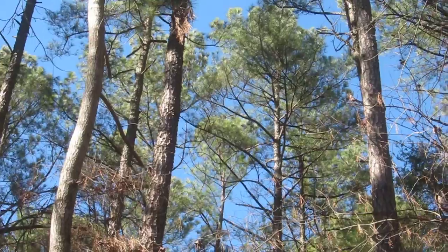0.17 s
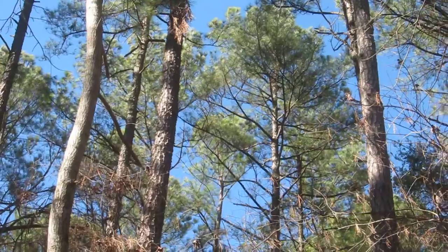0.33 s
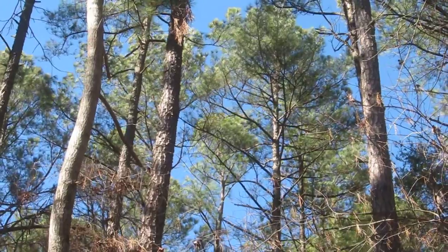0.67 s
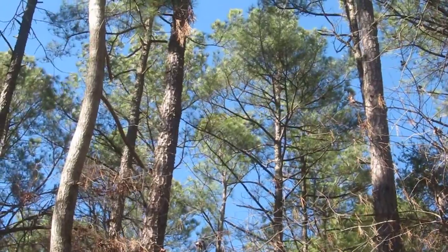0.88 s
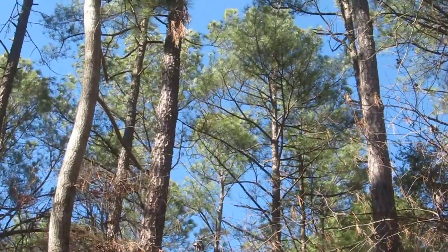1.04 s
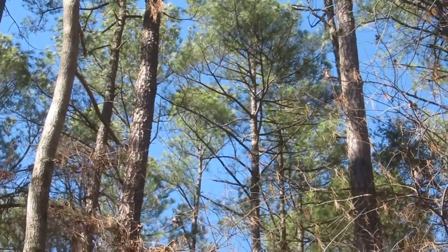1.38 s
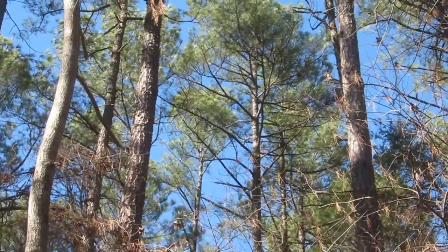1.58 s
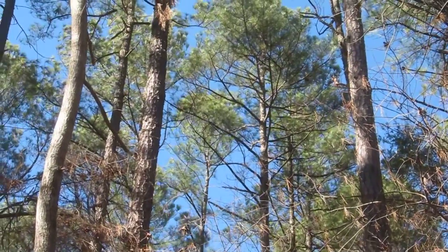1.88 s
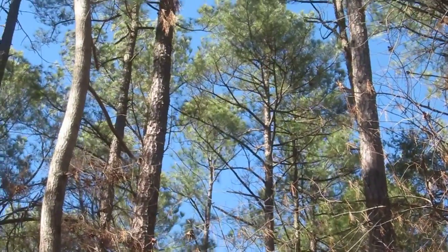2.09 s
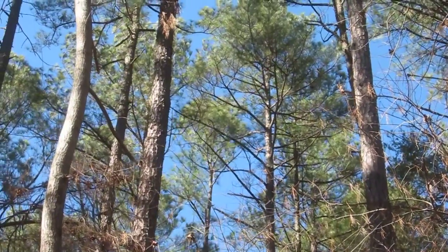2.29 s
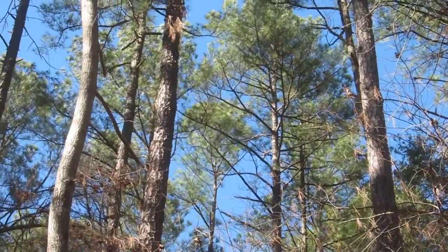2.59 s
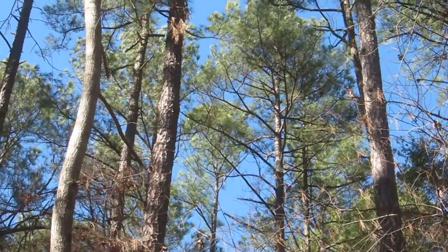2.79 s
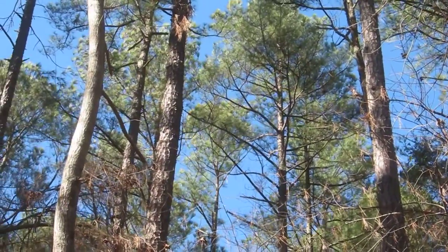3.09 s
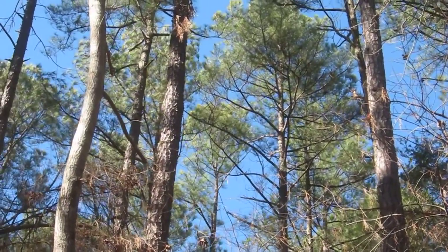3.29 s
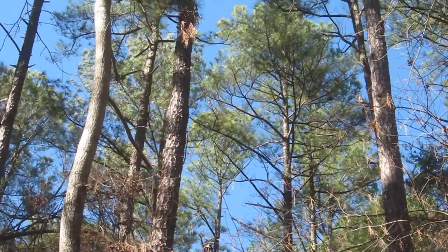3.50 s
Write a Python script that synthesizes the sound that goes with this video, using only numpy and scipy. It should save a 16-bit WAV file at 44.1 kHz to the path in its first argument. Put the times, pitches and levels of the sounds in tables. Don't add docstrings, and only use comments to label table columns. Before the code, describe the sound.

Wind roars softly in high pines while a faint bird whistles and a twig cracks

```python
import sys
import numpy as np
from scipy import signal
from scipy.fft import rfft, irfft, next_fast_len
from scipy.io import wavfile
from scipy.ndimage import uniform_filter1d, map_coordinates

SR = 44100
rng = np.random.default_rng(int(sys.argv[2]) if len(sys.argv) > 2 else 0)


def file_out(sig):
    cols = np.atleast_2d(sig).T
    lim = np.clip(cols, -1, 1)
    pcm = np.round(lim * 32767).astype(np.int16)
    wavfile.write(sys.argv[1], SR, pcm)


def gain_from_db(level_db):
    decades = np.asarray(level_db, float) / 20
    return 10 ** decades


N = 160524

# (frequency [Hz], level per hertz [dB])
RUMBLE_COLOUR = [(15, -20), (30, -9), (55, -0.5), (82, 2.5), (120, -6), (175, -15), (260, -45.5)]
# (frequency [Hz], level per hertz [dB])
CROWN_COLOUR = [(110, -2.5), (230, -3), (500, 0), (1050, -2.5), (1600, -8.5), (2600, -14.5), (4500, -20.5),
                (9000, -38.5)]
# (frequency [Hz], level per hertz [dB])
HISS_COLOUR = [(2500, -33), (5000, 9), (7000, 4), (9000, -2.5), (10800, 4), (13500, -9), (15000, -24),
               (15800, -30)]
# (frequency [Hz], likeness [0 to 1])
WIND_LIKENESS = [(40, .88), (80, .92), (150, .7), (290, .8), (640, .87), (1410, .64), (3100, .26),
                 (6800, .04)]

# (time [s], pitch [Hz], level [dB], left over right [dB])
HIGH_WHISTLE = [
    (.645, 6600, -70, 0),
    (.665, 6700, -52, -2),
    (.69, 6720, -48.5, -3),
    (.722, 6605, -49, -1),
    (.79, 6595, -49, 4),
    (.86, 6590, -50, -2),
    (.95, 6603, -55, 2),
    (1.015, 6600, -62, -2),
    (1.04, 6600, -75, 0),
]
LOW_WHISTLE = [
    (.988, 4230, -70, 0),
    (1.002, 4166, -53, 0),
    (1.022, 4056, -46, -2),
    (1.056, 3946, -44, -5),
    (1.1, 3905, -48.5, -4),
    (1.13, 3890, -44.5, -4),
    (1.17, 3863, -45, -3),
    (1.21, 3858, -44.5, -2),
    (1.224, 3840, -60, 0),
]
LOW_WHISTLE_GOES_ON = [
    (1.225, 3840, -60, -1),
    (1.28, 3810, -53, -3),
    (1.345, 3784, -44, 0),
    (1.42, 3775, -49, 5),
    (1.49, 3760, -49, -1),
    (1.53, 3735, -44.5, 1),
    (1.61, 3740, -44, 4),
    (1.69, 3715, -51, 8),
    (1.75, 3700, -66, -3),
]
WHISTLE_AGAIN = [
    (3.575, 6600, -75, 0),
    (3.59, 6630, -54.5, -1),
    (3.64, 6650, -59, 1),
]
# (frequency [Hz], time to fall 60 dB [s])
FOREST_FADE = [(1000, .6), (4000, .75), (9000, .6)]

# (time [s], peak level [dB], left over right [dB])
TWIG_BREAKS = [
    (1.43225, -12.5, 2),
    (1.4341, -33, 0),
    (1.4365, -47, 0),
]
# (frequency [Hz], level [dB], time to fall 60 dB [s])
TWIG_MODES = [(1900, -12, .008), (2700, -12, .005), (3500, -13, .003), (4300, -10, .003), (5050, 0, .0034),
              (5800, -5, .004), (6600, -11, .003), (9700, -22, .004), (11600, -19, .004),
              (13400, -25, .003), (14900, -29, .003)]
# (time [s], peak level [dB], ring [Hz], left over right [dB])
TWIG_TICKS = [(0.1337, -46, 5300, -1), (.2914, -50, 5030, -1), (.475, -47, 5000, 3), (.5478, -51, 5800, -1),
              (1.3145, -52, 11900, -5), (1.3690, -52, 11000, -6), (1.3692, -43, 4800, 4),
              (1.3775, -45, 5340, 6), (1.5345, -54, 11600, 0), (1.5378, -52, 12200, -3),
              (1.5374, -52, 6200, -3), (2.763, -41, 10500, 3)]
# (time [s], length [s], pitch [Hz], level [dB])
FAR_PEEPS = [
    (1.465, 0.008, 4150, -54),
    (1.565, 0.059, 2350, -61),
    (1.703, .05, 2360, -58),
    (1.833, 0.045, 2330, -57),
    (1.955, 0.065, 2313, -55),
    (2.094, 0.062, 2306, -57),
    (2.633, 0.03, 4740, -63),
    (2.405, .025, 7200, -70),
    (2.433, .02, 7200, -68),
    (2.48, .016, 2780, -61),
]

# (frequency [Hz], level [dB])
DRIVE_LINES = [(8775, -92), (8799, -78.5), (8823, -84), (8847, -94), (10903, -85), (15734, -99)]
# (frequency [Hz], left over right [dB])
PORT_BALANCE = [(60, 0.9), (700, 1), (2400, -1), (6000, 0), (10000, -3.5), (15000, -2)]
# (time [s], gain [dB])
CAMERA_GAIN = [(0, -7), (.3, -3.5), (.7, -2), (1.05, 0), (1.5, 1), (2.2, 0.5), (2.9, 0), (3.64, 0.93)]


def unit(x):
    return x / np.sqrt(np.mean(x ** 2) + 1e-20)


def along(points, hz):
    f, v = np.transpose(points)
    return np.interp(np.log(hz + 1), np.log(f + 1), v)


def curves(rows):
    s, *cols = np.transpose(rows)
    return [np.interp(np.arange(N) / SR, s, c) for c in cols]


def wobble(rate):
    return map_coordinates(rng.standard_normal(2000), [np.arange(N) * rate / SR])


def filtered(x, response):
    m = next_fast_len(N + SR // 2)
    spectrum = rfft(x, m) * response(np.fft.rfftfreq(m, 1 / SR))
    return irfft(spectrum, m)[..., :N]


def tone(pitch_hz, shift=0):
    return np.sqrt(2) * np.sin(2 * np.pi * np.cumsum(pitch_hz) / SR + shift)


def rush(colour, patchy_db):
    z = signal.stft(rng.standard_normal((2, N)), nperseg=512)[2]
    patches = uniform_filter1d(rng.standard_normal(z.shape[1:]), size=6, axis=0)
    patches = uniform_filter1d(patches, size=14, axis=1)
    pair = signal.istft(z * gain_from_db(patchy_db * unit(patches)), nperseg=512)[1][:, :N]

    def mid_and_side(hz):
        angle = np.arccos(np.clip(along(WIND_LIKENESS, hz), -1, 1)) / 2
        return gain_from_db(along(colour, hz)) * [np.cos(angle), np.sin(angle)]

    mid, side = filtered(pair, mid_and_side)
    return unit(np.array([mid + side, mid - side]))


def wind():
    breath_db = 0.4 * (wobble(1.65) + wobble(5.84))
    crowns = gain_from_db(-42 + breath_db) * rush(CROWN_COLOUR, patchy_db=0.62)
    rumble = gain_from_db(-46 + 1.4 * wobble(7.97)) * rush(RUMBLE_COLOUR, patchy_db=1.1)
    hiss = gain_from_db(-61 + 0.45 * breath_db) * rush(HISS_COLOUR, patchy_db=-0.1)
    return crowns + rumble + hiss


def forest(x):
    hz, t, z = signal.stft(rng.standard_normal((2, SR)), SR, nperseg=256)
    fade_db = -60 * t / along(FOREST_FADE, hz)[:, None]
    tail = signal.istft(z * gain_from_db(fade_db), SR, nperseg=256)[1]
    return signal.fftconvolve(np.atleast_2d(x), tail / np.linalg.norm(tail[0]), axes=1)[:, :N]


def whistles():
    left_lag_s, echo_db = 0.00005, -11
    fade_depth, fade_rate = 0.24, 110
    t, song = np.arange(N) / SR, np.zeros((2, N))
    drift_rad, side = 0.14 * wobble(11.53), np.array([[0.5], [-0.5]])
    for rows in (HIGH_WHISTLE, LOW_WHISTLE, LOW_WHISTLE_GOES_ON, WHISTLE_AGAIN):
        pitch_hz, db, pan_db = curves(rows)
        shift = side * (2 * drift_rad - 2 * np.pi * pitch_hz * left_lag_s)
        sounding = (t > rows[0][0]) * (t < rows[-1][0])
        shaky_hz = pitch_hz + 22 * wobble(70)
        song += gain_from_db(db + side * pan_db) * tone(shaky_hz, shift) * sounding
    shared = wobble(fade_rate)
    own = np.array([wobble(fade_rate), wobble(fade_rate)])
    fade = 1 + fade_depth * (shared + own)
    return song * unit(fade) + gain_from_db(echo_db) * forest(song[0])


def snap():
    right_lag_s = 0.00002
    rise_s = [[0.00034], [0.00016]]
    out = np.zeros((2, N))
    t = np.clip(np.arange(SR // 40) / SR - [[0], [right_lag_s]], 0, 1)
    swell = 1 - np.exp(-(t / rise_s) ** 2)
    for s, db, pan_db in TWIG_BREAKS:
        ring = 0
        for hz, mode_db, t60 in TWIG_MODES:
            uneven_db = rng.normal(0, 1, (2, 1))
            ring = ring + gain_from_db(mode_db + uneven_db - 60 * t / t60) * np.sin(2 * np.pi * hz * t)
        pan = gain_from_db([[pan_db / 2], [-pan_db / 2]])
        out[:, round(s * SR):][:, :t.shape[1]] += gain_from_db(db + 2) * pan * ring * swell
    return out


def ticks():
    ring_t60_s, crack_t60_s, rise_s = 0.0041, 0.0033, 0.000094
    crack_db, second_db, second_ratio = -7, -4, 1.14
    out, t = np.zeros((2, N + SR)), np.arange(SR // 50) / SR
    for s, db, hz, pan_db in TWIG_TICKS:
        ring = np.sin(2 * np.pi * hz * t)
        ring += gain_from_db(second_db) * np.sin(2 * np.pi * hz * second_ratio * t)
        crack = gain_from_db(crack_db - 60 * t / crack_t60_s) * rng.standard_normal((2, len(t)))
        tick = (ring * gain_from_db(-60 * t / ring_t60_s) + crack) * (1 - np.exp(-t / rise_s))
        pan = gain_from_db([[pan_db / 2], [-pan_db / 2]])
        out[:, round(s * SR):][:, :len(t)] += 2.05 * gain_from_db(db) * pan * tick
    return out[:, :N]


def chip():
    start_s, long_s, from_hz, to_hz = 2.4645, 0.021, 7350, 2600
    level_db, echo_db = -51, 9
    u = np.clip((np.arange(N) / SR - start_s) / long_s, 0, 1)
    glide = (1 + np.cos(np.pi * u ** 0.85)) / 2
    loudness = gain_from_db(level_db + 1.5 - 9.6 * u) * np.sin(np.pi * u) ** 0.5
    call = loudness * tone(to_hz + (from_hz - to_hz) * glide)
    return call + gain_from_db(echo_db) * forest(call)


def peeps():
    sag, echo_db = 0.03, -6
    t, song = np.arange(N) / SR, np.zeros(N)
    for s, long_s, hz, db in FAR_PEEPS:
        u = np.clip((t - s) / long_s, 0, 1)
        song += gain_from_db(db) * np.sin(np.pi * u) * tone(hz * (1 + sag * (0.5 - u)))
    return song * gain_from_db(3.3 * wobble(80.2)) + gain_from_db(echo_db) * forest(song)


def drive():
    steady = sum(gain_from_db(db) * tone(np.full(N, hz)) for hz, db in DRIVE_LINES)
    wander_hz = 11060 + 54.7 * wobble(19)
    wander = gain_from_db(-77 + 1.3 * wobble(30.14)) * tone(wander_hz)
    return steady * gain_from_db([[-1.5], [1.5]]) + wander * [[0.3], [1.6]]


def scene():
    return wind() + whistles() + snap() + ticks() + chip() + peeps() + drive()


def top_cut(x):
    return signal.sosfilt(signal.butter(12, 16450, fs=SR, output="sos"), x)


def record(dry):
    notch_hz, notch_wide_hz, notch_db = 8110, 370, -20.5
    top_hz, start_s = 15830, 0.0358

    def colour(hz):
        notch = notch_db * np.exp(-((hz - notch_hz) / notch_wide_hz) ** 2)
        balance = np.outer([0.5, -0.5], along(PORT_BALANCE, hz))
        return gain_from_db(notch + balance) * (hz < top_hz)

    gain_db, = curves(CAMERA_GAIN)
    started = np.arange(N) / SR > start_s
    mix = filtered(dry, colour) * gain_from_db(gain_db) * started
    return top_cut(mix)


dry = scene()
out = record(dry)
file_out(out)
```